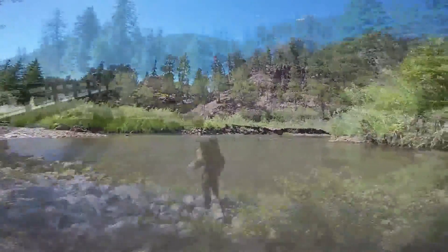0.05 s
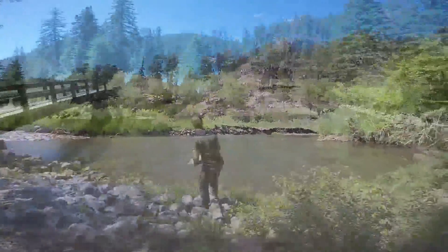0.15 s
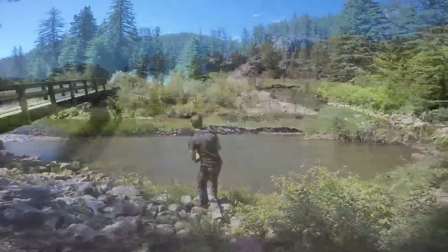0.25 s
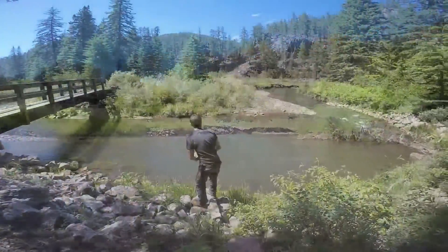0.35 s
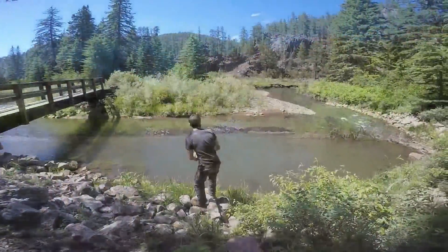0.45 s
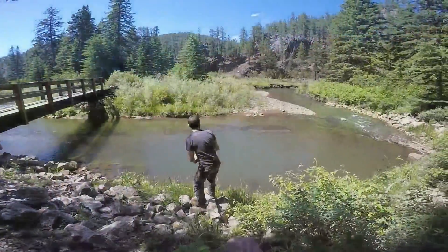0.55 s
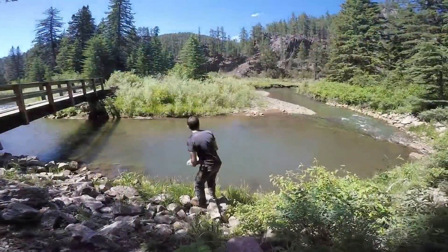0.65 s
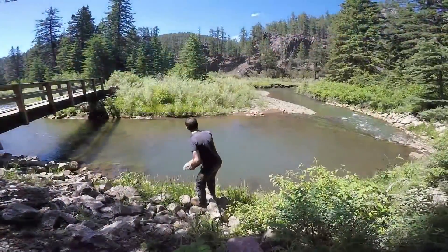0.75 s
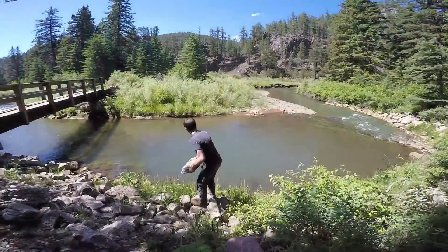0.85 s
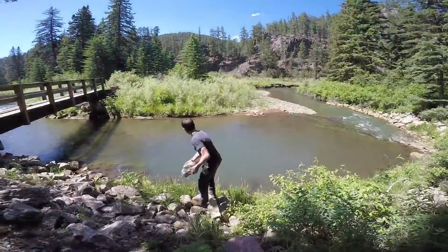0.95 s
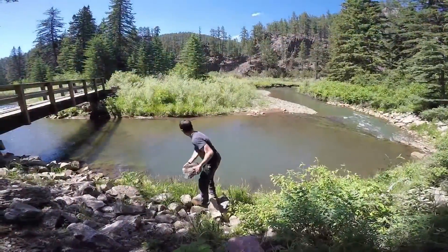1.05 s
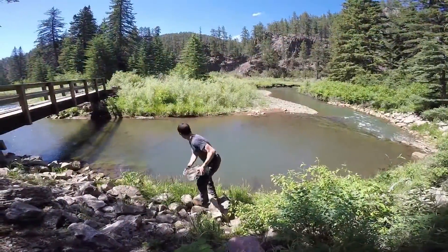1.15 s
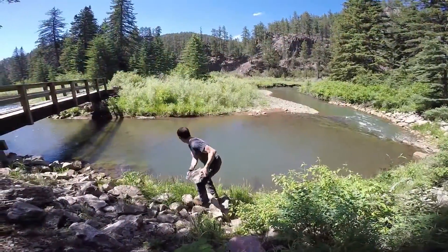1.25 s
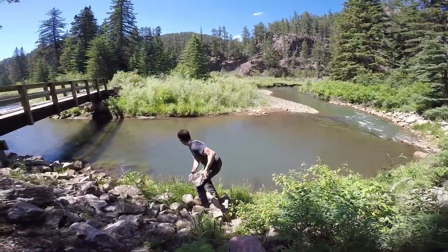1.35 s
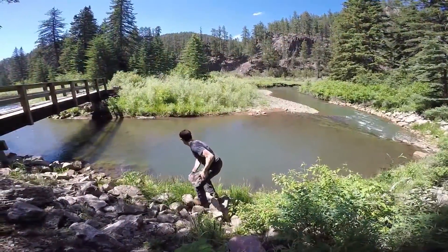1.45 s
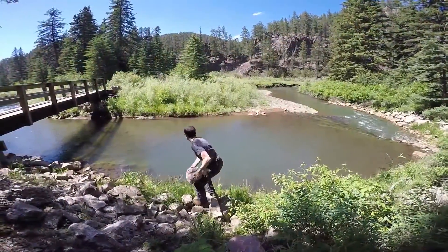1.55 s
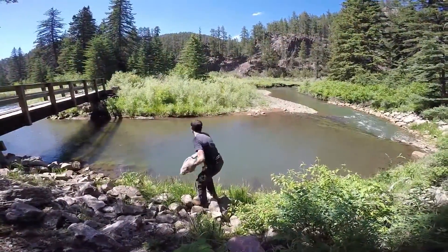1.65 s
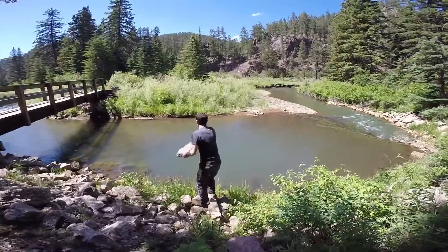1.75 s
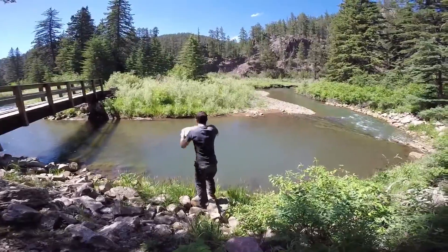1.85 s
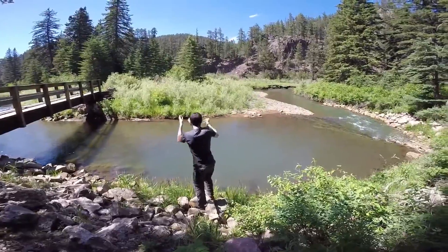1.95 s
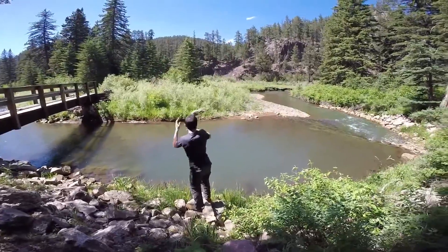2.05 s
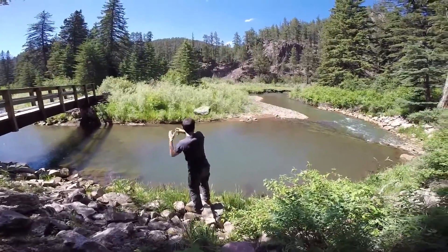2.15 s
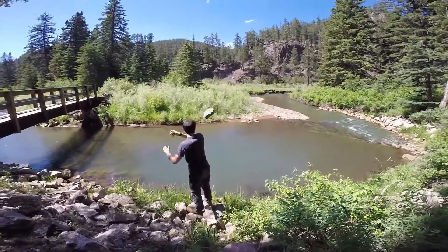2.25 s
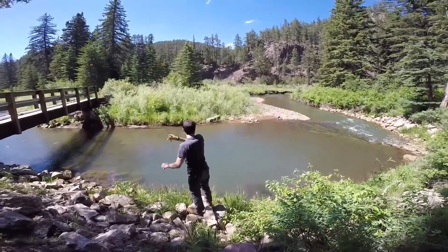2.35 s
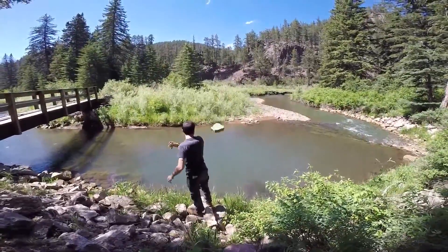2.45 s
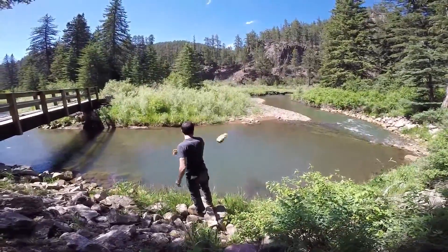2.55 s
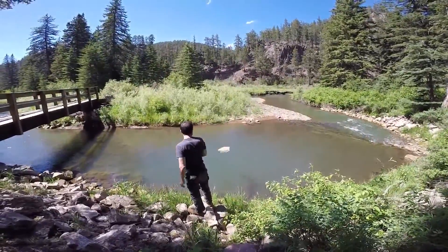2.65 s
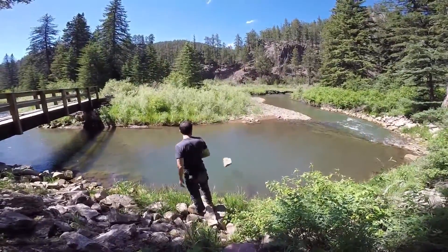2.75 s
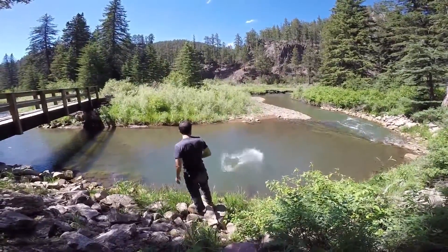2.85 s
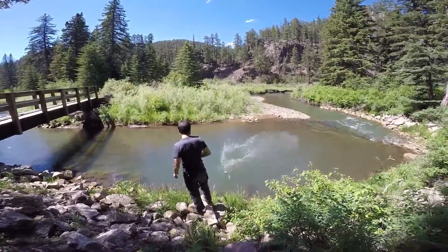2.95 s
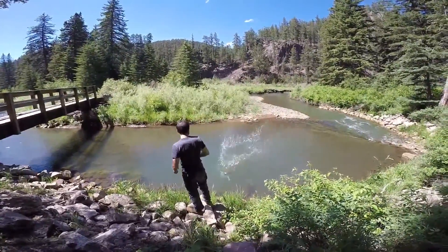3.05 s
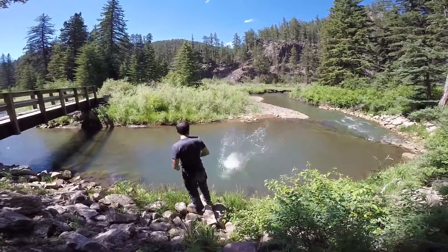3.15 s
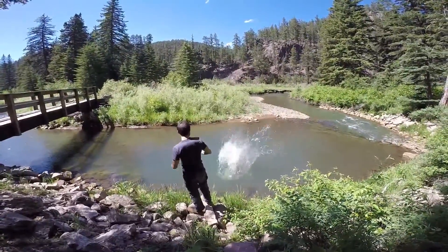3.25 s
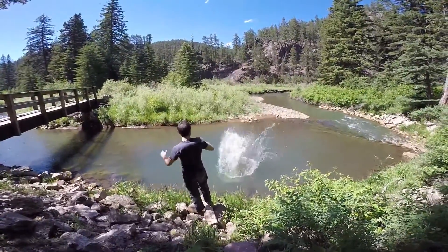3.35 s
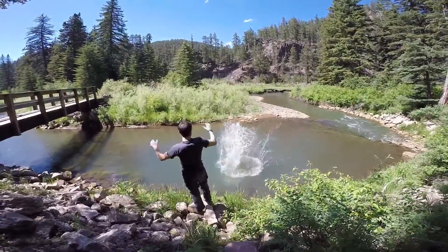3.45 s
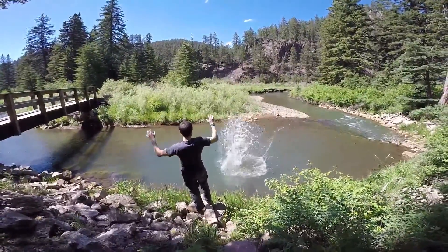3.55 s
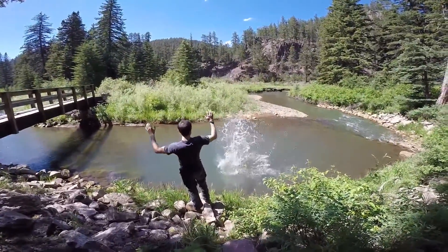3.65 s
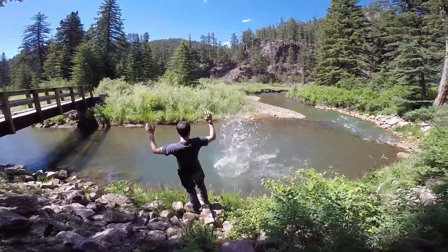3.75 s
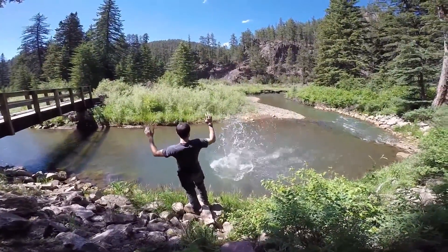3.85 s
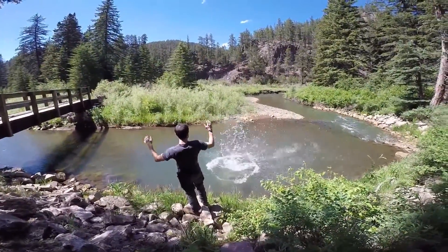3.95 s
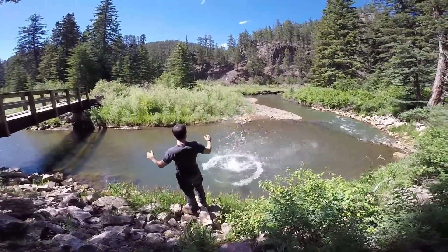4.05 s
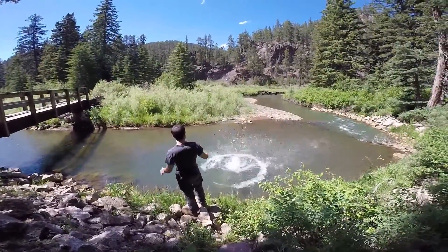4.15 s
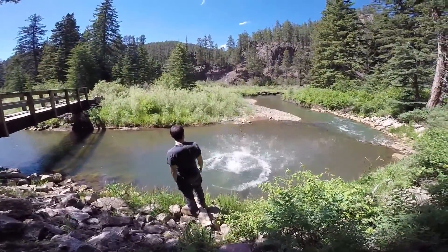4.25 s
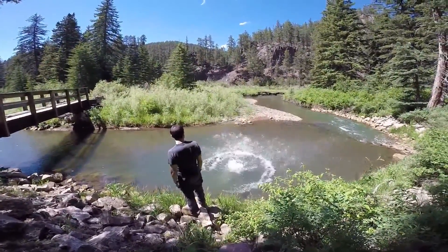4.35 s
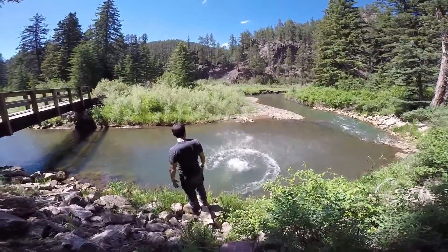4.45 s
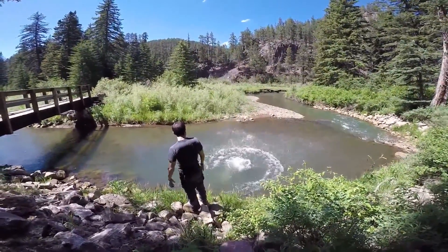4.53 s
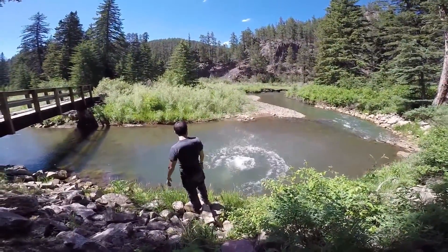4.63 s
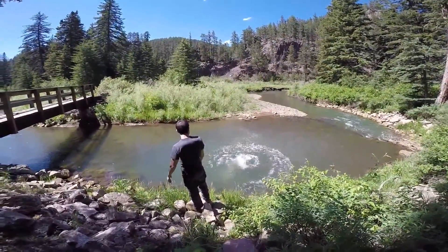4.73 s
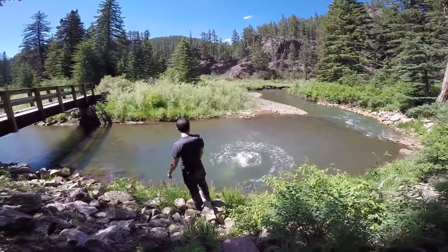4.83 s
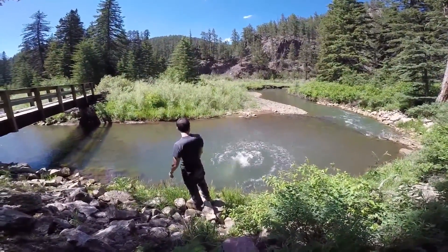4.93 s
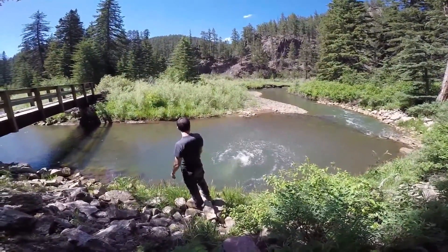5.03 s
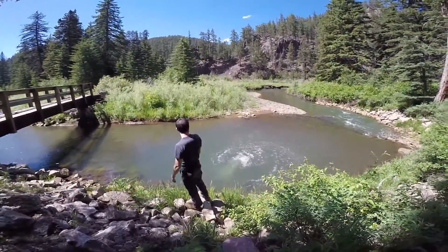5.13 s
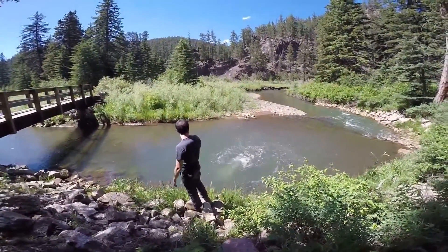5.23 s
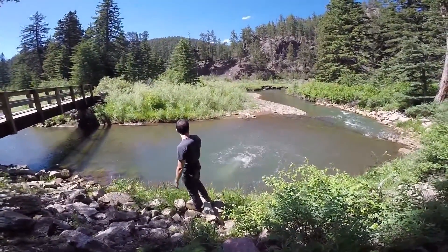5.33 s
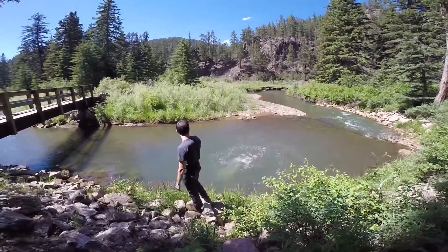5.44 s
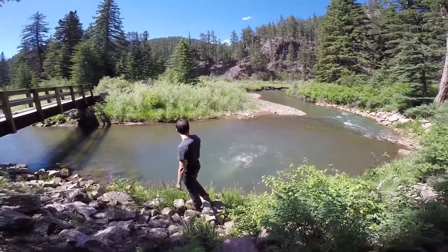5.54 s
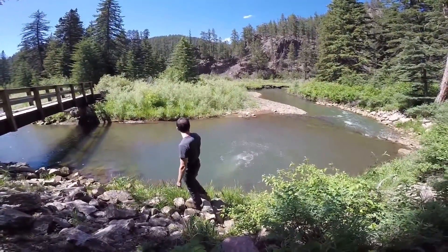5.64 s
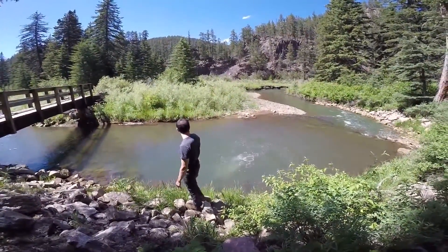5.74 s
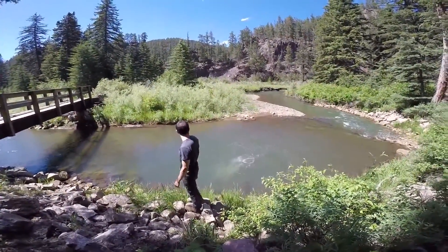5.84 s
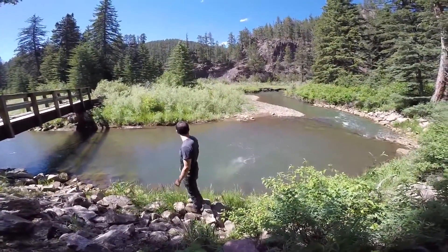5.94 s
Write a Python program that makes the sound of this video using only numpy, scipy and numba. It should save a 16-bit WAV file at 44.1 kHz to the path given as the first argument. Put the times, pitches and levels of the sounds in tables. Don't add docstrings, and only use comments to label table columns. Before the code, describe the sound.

A steady, distant stream murmurs with faint gurgles and low wind rumble. A big rock hits the pool with a hard, bright smack; a moment later the air hole closes in a boomy gulp that snaps the microphone. Spray patters down densely, bubbles plink, then only separate drips and the quiet creek remain. Open air, a faint dull echo, close splash.

```python
import sys
import numpy as np
from scipy import signal
from scipy.fft import rfft, irfft
from scipy.io import wavfile
from scipy.ndimage import uniform_filter1d
from numba import njit

SR = 44100
rng = np.random.default_rng(int(sys.argv[2]) if len(sys.argv) > 2 else 0)


def dump(signal):
    limited = np.clip(np.atleast_2d(signal).T, -1, 1)
    pcm = np.round(limited * 32767).astype(np.int16)
    wavfile.write(sys.argv[1], SR, pcm)


def undo_db(level):
    steps = np.asarray(level, float) / 20
    return 10 ** steps


N = 264159
T = np.arange(N) / SR

# f/Hz, level/dB (per Hz)
CREEK_COLOUR = [(110, -44), (180, -8.5), (394, 1), (616, -6.5), (1160, -5), (1430, -4.5), (1750, -15),
                (2190, -8), (3060, -15.5), (3900, -13), (4610, -19), (5560, -21), (11300, -32.5),
                (14100, -32.5), (15500, -37)]
# t/s,
# level/dB, rumble above it/dB, rise/s, fall/s
GUSTS = [(0.02, -39.6, -44.9, 0.047, 0.21), (0.153, -29.5, -48, 0.068, 0.031),
         (0.403, -44.4, -28, 0.61, 0.14), (0.48, -43, -18, 0.12, 0.081), (1.629, -40, -35, 0.03, 0.089),
         (1.746, -35, -20, 0.024, 0.11), (1.966, -40.5, -35.7, 0.061, 0.033),
         (2.151, -43, -24, 0.62, 0.027), (2.233, -43.6, -18, 0.081, 0.49), (2.507, -40.5, -15, 0.03, 0.12),
         (2.878, -44.5, 1, 0.032, 0.19), (2.999, -48.6, -9, 0.25, 0.074), (3.202, -27.9, 3.5, 0.04, 0.1),
         (3.309, -30.5, -21, 0.14, 0.049), (3.407, -39.5, -1.2, 0.3, 0.19), (3.626, -42.5, -9, 0.035, 0.2),
         (3.919, -49, 6, 0.11, 0.54), (4.185, -50.5, -12, 0.07, 1.132), (4.867, -57, 9, 0.03, 0.064),
         (5.041, -49.5, -16.2, 0.03, 0.46), (5.386, -38.5, -25, 0.066, 0.22),
         (5.649, -40, -23, 0.286, 0.06), (5.724, -40, -19, 0.044, 0.098), (5.96, -42.5, -16, 0.35, 0.3)]
# t/s, level/dB, f/Hz, length/cycles
BUBBLES = [(1.655, -37, 1210, 7.5), (2.71, -32, 1210, 8), (3.055, -26.5, 1040, 11), (3.639, -18, 1220, 4.9),
           (3.739, -23, 3360, 9.9), (3.777, -22, 1690, 7), (3.818, -19, 2620, 8.8), (3.845, -23, 1950, 7.7),
           (3.873, -22.5, 1480, 10), (3.919, -22, 970, 8), (3.948, -28, 890, 8), (4.17, -21, 1710, 8),
           (4.36, -24, 1380, 7.7), (4.485, -20, 2050, 6.8), (4.513, -33, 2740, 8), (4.569, -28, 2300, 13),
           (4.59, -31, 1970, 13), (4.855, -26, 1090, 5.3), (4.916, -35, 1200, 11), (5.095, -31, 1370, 11),
           (5.347, -30, 1330, 7.4), (5.386, -34, 1240, 8), (5.621, -27.5, 1120, 6.9), (5.97, -36, 1050, 8)]
# t/s, level/dB, f/Hz
TICKS = [(3.757, -27, 6100), (4.097, -28.5, 6630), (4.2266, -31, 7830), (4.2805, -31, 6340),
         (4.3648, -34, 7810), (4.4721, -38, 9200), (4.5254, -34, 7870), (4.6097, -40, 7570),
         (4.6437, -39, 11300), (4.686, -32, 11100), (4.7445, -30.5, 11000), (4.7684, -40, 6180),
         (4.782, -36, 7000), (4.817, -33, 6600), (4.8347, -34, 8200), (4.918, -33, 6530),
         (4.9355, -47, 10000), (4.967, -34, 6800), (4.984, -31, 10700), (5.0193, -41, 9590),
         (5.034, -32, 10600), (5.0687, -32, 9700), (5.135, -35, 10700), (5.172, -48, 6490),
         (5.635, -44, 7420), (5.6833, -46, 6420), (5.7836, -52, 7800), (5.9133, -45, 7210),
         (5.9741, -48.5, 7060)]
# t/s, level/dB, f/Hz, length/cycles
PLOPS = [(4.4828, -36, 3390, 4), (4.5132, -30, 2730, 4), (4.5351, -26.5, 3500, 3.7), (4.6449, -48, 2850, 4),
         (4.815, -47, 3500, 4), (4.8574, -32, 4180, 3), (4.9163, -29, 3780, 4), (4.9662, -37, 4010, 4),
         (5.017, -39, 2500, 4), (5.017, -33, 4400, 5.2), (5.05, -43, 3480, 3.5), (5.1727, -38, 3420, 4),
         (5.3618, -39, 3960, 4), (5.5887, -48, 3830, 4), (5.6177, -36, 3900, 4), (5.9015, -37.5, 4450, 4)]
# f/Hz, level/dB (per Hz)
SPLASH_COLOUR = [(53, -31), (90, 11), (130, -1), (187, -7), (227, -1), (328, -5.5), (381, -1), (599, -10),
                 (1070, -2.5), (1960, -3.5), (2280, -10), (3360, -4), (4440, -4.5), (10300, -16),
                 (15500, -18)]
SIZE_LIMITS = (190, 650, 2300, 6500, 15500)
SIZE_LEVELS = (-9, -1.3, -0.1, -9.5)
THINNING = (4.4, 4.75)
# t/s, level/dB, rise/s, fall/s, brightness/dB per droplet size
SHEETS = [(2.911, -44.5, 0.04, 0.11, 0.8), (3.052, -46.2, 0.13, 0.12, -5), (3.144, -46.5, 0.031, 0.32, 2.5),
          (3.195, -47, 0.14, 0.484, -11), (3.283, -52.5, 0.069, 0.281, 7.5), (3.395, -43, 0.18, 0.7, -0.6),
          (3.543, -43, 0.43, 0.34, 0.5), (3.642, -46.5, 0.108, 0.263, 5), (3.755, -43, 0.025, 0.73, 1.3),
          (4.011, -38, 0.2, 0.44, -4.5), (4.107, -43.5, 0.29, 0.24, 3.5), (4.224, -36, 0.55, 0.072, -2.3),
          (4.316, -35, 0.3, 0.25, 2.2), (4.381, -49, 0.124, 0.087, -9), (4.562, -45.5, 0.28, 0.48, -1.4),
          (4.843, -63, 0.5, 0.42, 12), (4.86, -49, 0.015, 0.046, -1), (5.065, -60.5, 0.202, 0.065, 7),
          (5.144, -71, 0.054, 0.029, 15), (5.78, -52.5, 0.058, 1, -5.5), (5.894, -50, 0.296, 0.17, -4.5)]
# t/s, level/dB, f/Hz, length/cycles
SLAPS = [
    (2.8613, -3.5, 4200, 1.8),
    (2.8622, -11, 4460, 1.6),
    (2.8735, -19, 1510, 3.7),
    (2.8773, -18.5, 1140, 7.6),
    (3.163, -25, 590, 14),
    (2.8615, -15, 10500, 2.5),
    (2.8697, -25, 1300, 2.7),
    (3.1625, -19, 304, 3.7),
    (3.19, -15, 256, 2.2),
]
# t/s, level/dB, centre f/Hz, rise/s, time to fall 60 dB/s
BURSTS = [(2.8585, -41, 5000, 0.00084, 0.022), (2.861, -26.5, 4120, 0.0013, 0.12),
          (2.868, -24, 1360, 0.009, 0.05), (2.872, -36, 3970, 0.0053, 0.066),
          (2.86, -39, 11500, 0.00056, 0.15), (2.88, -36, 200, 0.0045, 0.14),
          (3.145, -40, 1770, 0.0041, 0.13), (3.16, -30, 2650, 0.0064, 0.15),
          (3.16, -40, 300, 0.0022, 0.072), (3.185, -28.5, 300, 0.009, 0.085),
          (3.273, -41, 5000, 0.0049, 0.18), (4.855, -46, 250, .008, 0.054),
          (3.165, -26.5, 980, 0.016, 0.047)]
# t/s, level/dB, f/Hz, glide/per s, length/s
CAVITY = [
    (3.144, -35, 89, -2, 0.018),
    (3.157, -5.5, 46, 1.5, 0.043),
    (3.162, -19, 140, -4, 0.0185),
    (3.186, -16.5, 112, 0.5, 0.031),
    (3.204, -27.5, 69.7, 7, 0.039),
    (3.229, -20, 66.4, 4, 0.022),
    (3.268, -30, 29.8, -4.5, 0.057),
    (2.876, -36, 60.3, 6, 0.03),
    (2.878, -32, 130, 2, 0.0154),
    (4.855, -39, 89, 0, 0.028),
]


def unit(x):
    return x / np.sqrt(np.mean(x ** 2))


def walk(rate):
    hold = int(SR / rate)
    levels = np.repeat(rng.standard_normal(N // hold + 1), hold)
    return 1.5 * uniform_filter1d(uniform_filter1d(levels, hold), hold)[:N]


def band(x, lo_hz, hi_hz):
    limits = [max(lo_hz, 10), min(hi_hz, 19000)]
    return signal.sosfilt(signal.butter(2, limits, "bandpass", fs=SR, output="sos"), x)


def swell(s, db, rise, fall):
    s, db, rise, fall = (np.reshape(v, (-1, 1)) for v in (s, db, rise, fall))
    t = T[::64]
    away = np.maximum((s - t) / np.abs(rise), (t - s) / np.abs(fall))
    each = undo_db(db - 20 * away)
    return np.interp(T, t, np.sqrt(np.sum(each ** 2, axis=0)))


@njit
def ring(start, hz, cycles, size, glide, count):
    out = np.zeros(count)
    for k in range(len(start)):
        step = 2 * np.pi * hz[k] / SR
        fade = np.exp(-3 * hz[k] / (cycles[k] * SR))
        length = int(2 * cycles[k] * SR / hz[k]) + 2
        phase, a = 0., size[k]
        for i in range(start[k], min(start[k] + length, count)):
            out[i] += a * np.sin(phase) * (1 - np.exp(-phase / 2))
            phase += min(step, 3.)
            step *= 1 + glide / length
            a *= fade
    return out


def patter(count, lo_hz, hi_hz, cycles):
    when, pitch, loud = rng.random((count, 3)).T
    start = (when * N).astype(np.int64)
    hz = lo_hz * (hi_hz / lo_hz) ** pitch
    size = undo_db(-5 * np.log(1.06 - loud))
    return unit(ring(start, hz, cycles + 0 * hz, size, .1, N))


def water(colour, count, cycles, spread_db, hiss_db):
    when, pitch, loud = rng.random((count, 3)).T
    start = (when * N).astype(np.int64)
    hz = 150 * 100 ** pitch
    size = hz * undo_db(-spread_db * np.log(1.02 - loud))
    crowd = unit(ring(start, hz, cycles + 0 * hz, size, 0.44, N))
    f = np.maximum(np.arange(N // 2 + 1) * SR / N, 1)
    colour_hz, colour_db = np.transpose(colour)
    tint = undo_db(np.interp(np.log(f), np.log(colour_hz), colour_db))
    return rfft(crowd + undo_db(hiss_db) * rng.standard_normal(N)) * tint, f


def creek():
    spectrum, _ = water(CREEK_COLOUR, count=40000, cycles=7.1, spread_db=2.5, hiss_db=0.5)
    fade_in_db = -8.5 * np.maximum(1 - T / 0.49, 0)
    rise_db = 0.77 * np.minimum(T, 2.75)
    flicker_db = 0.2 * walk(1.36) + 0.21 * walk(5.83)
    gurgle = patter(count=800, lo_hz=715, hi_hz=2300, cycles=16) * undo_db(-14.5 + 2.4 * walk(5.7))
    return (unit(irfft(spectrum, N)) + gurgle) * undo_db(-50 + fade_in_db + rise_db + flicker_db)


def wind():
    breeze_db, hum_db, eddy_hz = -60.5, -69, 31
    s, db, rumble_db, rise, fall = np.transpose(GUSTS)
    force = uniform_filter1d(np.hypot(undo_db(breeze_db), swell(s, db, rise, fall)), size=900)
    rumble = np.hypot(undo_db(hum_db), swell(s, db + rumble_db, rise, fall))
    pace = eddy_hz * undo_db(2.2 * walk(30))
    swing = np.sqrt(2) * np.sin(2 * np.pi * np.cumsum(pace) / SR) * undo_db(2 * walk(24) - 1)
    rough = unit(band(band(rng.standard_normal(N), 20.6, 53), 15.5, 70))
    surge = unit(band(band(rng.standard_normal(N), 53, 192), 57, 199)) * rumble
    calm = 1 - np.exp(-((T - 3.19) / 0.057) ** 8)
    return ((0.92 * swing + 0.7 * rough) * force + surge) * calm


def rainfall(size, db):
    s, peak_db, rise, fall, bright_db = np.transpose(SHEETS)
    return swell(s, peak_db + db + bright_db * (size - 3 / 2), rise, fall)


def splash():
    spectrum, f = water(SPLASH_COLOUR, count=30000, cycles=5.8, spread_db=3.5, hiss_db=3.0)
    apart = np.interp(T, THINNING, (.45, .8))
    drops = [patter(count=300, lo_hz=200, hi_hz=600, cycles=5.3),
             patter(count=900, lo_hz=770, hi_hz=2190, cycles=1.8),
             patter(count=1200, lo_hz=2380, hi_hz=5950, cycles=12.0),
             patter(count=900, lo_hz=7740, hi_hz=12900, cycles=8.4)]
    weights = (0.41, 0.58, 0.9, 0.95)
    clumps = walk(30)
    out = 0
    for size in range(4):
        lo, hi = SIZE_LIMITS[size], SIZE_LIMITS[size + 1]
        share = np.sqrt(1 / (1 + (f / hi) ** 8) - 1 / (1 + (f / lo) ** 8))
        wash = unit(irfft(spectrum * share, N))
        single = np.clip(weights[size] * apart, 0, 1)
        rain = np.sqrt(1 - single ** 2) * wash + single * drops[size]
        out = out + rain * rainfall(size, SIZE_LEVELS[size]) * undo_db(0.58 * clumps + 1.2 * walk(27.94))
    return out


def ringing_hits():
    ticks = [(*tick, 5.8) for tick in TICKS]
    s, db, hz, cycles = np.transpose(list(BUBBLES) + ticks + list(PLOPS) + list(SLAPS))
    db = db - 6.5 * (np.arange(len(s)) < len(BUBBLES))
    return ring((s * SR).astype(np.int64), hz, np.maximum(cycles, 1), undo_db(db + 4.0), 0.13, N)


def torn_water():
    out = np.zeros(N)
    t = np.arange(SR // 3) / SR
    for s, db, hz, rise, t60 in BURSTS:
        half_hz = 0.96 * hz / 2
        middle_hz = np.hypot(hz, half_hz)
        noise = unit(band(rng.standard_normal(len(t)), middle_hz - half_hz, middle_hz + half_hz))
        shape = np.minimum(t / rise, 1) ** 2 * undo_db(-60 * np.maximum(t - rise, 0) / t60)
        out[int(s * SR):][:len(t)] += undo_db(db) * noise * shape
    return out


def air_cavity():
    out = np.zeros(N)
    for s, db, hz, glide, length in CAVITY:
        t = np.arange(int(length * SR)) / SR
        swing = -np.cos(2 * np.pi * hz * t * (1 + glide * t))
        out[int(s * SR):][:len(t)] += undo_db(db) * swing * np.sin(np.pi * t / length) ** 0.5
    out[int(3.1877 * SR)] -= undo_db(-11)
    return out


def scene():
    near = splash() + ringing_hits() + torn_water() + air_cavity()
    echo = undo_db(-27.0) * np.roll(band(near, 330, 3600), int(.19 * SR))
    return (creek() + wind() + near + echo)[None]


def top_cut(x):
    return signal.sosfilt(signal.butter(12, 16520, fs=SR, output="sos"), x)


def record(dry):
    x = signal.sosfilt(signal.butter(1, 12, "highpass", fs=SR, output="sos"), dry)
    x = signal.sosfilt(signal.ellip(8, .2, 50, 15400, fs=SR, output="sos"), x)
    return top_cut(x)


dry = scene()
out = record(dry)
dump(out)
```